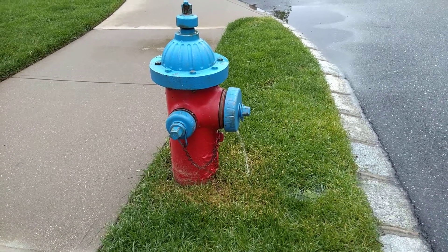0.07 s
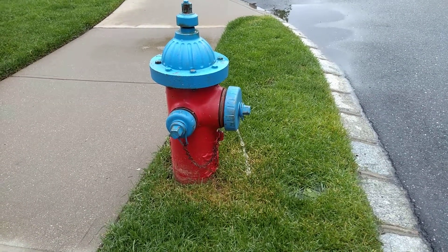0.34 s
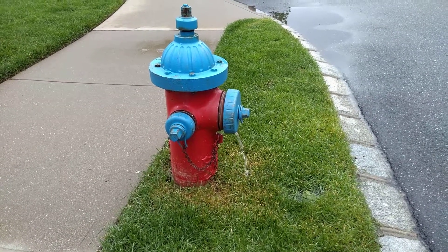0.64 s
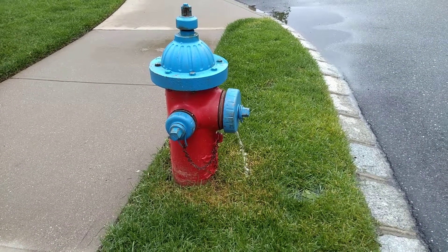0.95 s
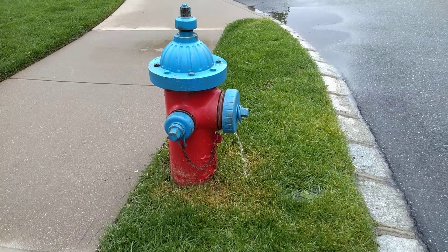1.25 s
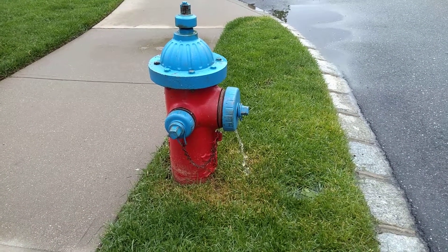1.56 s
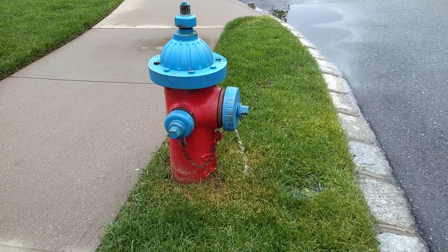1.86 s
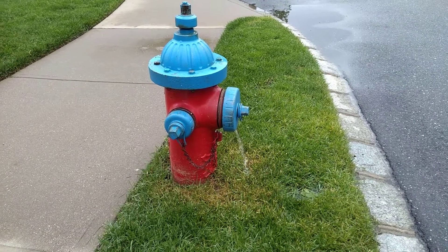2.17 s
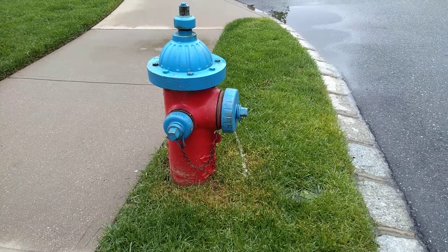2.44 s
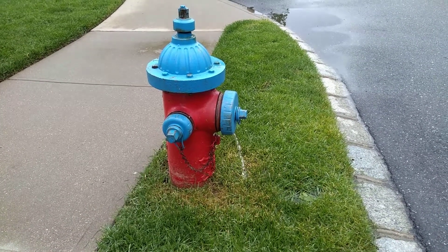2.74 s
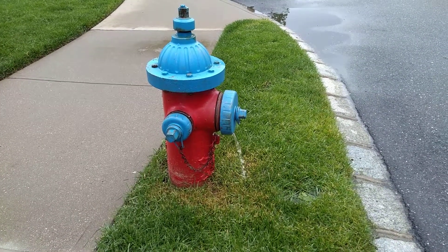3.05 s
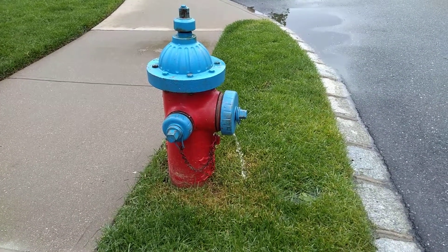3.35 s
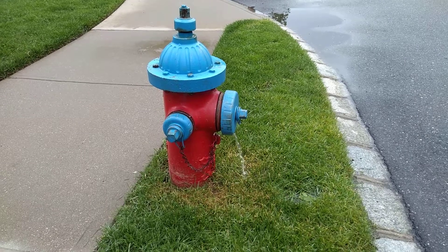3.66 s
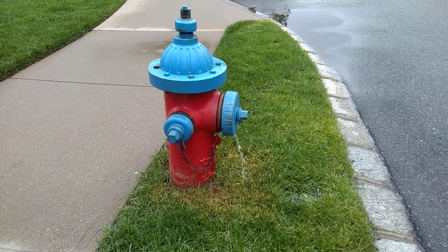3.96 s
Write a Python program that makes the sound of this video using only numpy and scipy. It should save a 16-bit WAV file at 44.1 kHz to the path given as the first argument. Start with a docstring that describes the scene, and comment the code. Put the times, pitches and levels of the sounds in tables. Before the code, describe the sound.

Water leaking from a hydrant splatters onto soaked grass, with faint traffic behind.

```python
"""A thin stream leaks from a hydrant, breaks into drops and patters on wet grass about two metres away.
Each drop slaps the soaked turf, ticks off the blades and throws a fizz of spray, with tiny bubbles
ringing in it. A few plop into the puddle, and fine droplets sizzle in between.
Distant traffic lays a rumbling bed behind. Two spaced microphone ports give the stereo image."""
import sys
import numpy as np
from scipy.fft import rfft, irfft, next_fast_len
from scipy.io import wavfile
from scipy.ndimage import uniform_filter1d, map_coordinates

SR = 44100
rng = np.random.default_rng(int(sys.argv[2]) if len(sys.argv) > 2 else 0)


def store_wav(level_fs):
    """Save 16-bit WAV to argv[1]."""
    pcm = np.round(np.clip(np.atleast_2d(level_fs), -1, 1) * 32767)
    wavfile.write(sys.argv[1], SR, pcm.T.astype(np.int16))


N = 176400

# Traffic fader moves, before the trims (time [s], rumble [dB], engine drone [dB], road roar [dB])
TRAFFIC_FADERS = [(0.05, -48, -42, -39.5), (0.46, -49.5, -45.5, -37.5), (0.56, -49.5, -45.5, -39.5),
                  (1.18, -46.5, -46, -41), (2.95, -52, -43, -40.5), (3.53, -44.5, -45.5, -41),
                  (3.92, -47.5, -41, -43)]
# EQ curves of the four traffic layers (frequency [Hz], level [dB])
RUMBLE_EQ = [(20, -19), (29, -33), (42, -9), (55, -8), (72, 3), (100, -4.5), (130, -23), (250, -55)]
DRONE_EQ = [(70, -28), (112, -4), (134, 1), (152, -5), (185, -7), (230, -20), (400, -45)]
ROAR_EQ = [(130, -18.5), (200, -2), (265, -1), (310, -6), (400, -20.5), (700, -60), (2000, -81)]
TYRES_EQ = [(100, -8.5), (350, 3.5), (430, -1.5), (510, 3), (680, -3.5), (860, 0.5), (1150, -3.5),
            (1500, -2), (1850, -4), (2200, -9.5), (3000, -17.5), (6000, -31), (14000, -49)]
# Stereo image of the traffic (frequency [Hz], left-right correlation [clipped to -1..1])
TRAFFIC_CORRELATION = [(30, -0.86), (65, 0.11), (95, 0.68), (140, 0.5), (260, 0.47), (380, 0.33),
                       (600, 0.5), (1000, 0.99), (1300, 0.32), (1600, 0.061), (2150, -1.134), (3000, 1),
                       (4300, -0.96), (5500, -0.17), (8000, -0.7)]

# Heavy drop cues, before the trims (time [s], slap [dB], tick [dB], fizz [dB], decay before clipping [s])
HEAVY_DROPS = [(0.0367, -43, -43, -46.5, 0.0012), (0.047, -48, -37.5, -43, 0.0032),
               (0.0869, -34, -41, -43.5, 0.002), (0.2203, -46, -42, -40.5, 0.0017),
               (0.2457, -54, -48, -42, 0.0016), (0.2787, -59, -50, -40.5, 0.0013),
               (0.3415, -45.0, -45.0, -43, 0.0028), (0.421, -42, -43, -40, 0.0019),
               (0.4314, -42, -45, -44, 0.0035), (0.5265, -40, -48, -42.5, 0.0034),
               (0.6357, -41, -45.5, -43, 0.0013), (0.643, -40.5, -41.5, -45.5, 0.0023),
               (0.7055, -40.5, -59, -41.5, 0.0008), (0.8838, -43.5, -57.5, -45, 0.00063),
               (0.9133, -42, -44, -40, 0.0028), (0.9551, -38.0, -39, -36, 0.0032),
               (1.0936, -38, -53.0, -46.5, 0.0007), (1.1518, -45, -46.0, -41.5, 0.0021),
               (1.1863, -40.0, -48, -43.5, 0.0026), (1.221, -35, -41, -45, 0.0016),
               (1.2634, -34.5, -53, -46, 0.00082), (1.2828, -38, -40.5, -47.0, 0.00045),
               (1.3775, -45, -35.5, -39, 0.0043), (1.4418, -44, -47, -49, 0.0013),
               (1.4664, -40.5, -60.5, -61, 0.00071), (1.5185, -38, -48.0, -44, 0.0011),
               (1.6011, -40.5, -38.5, -43.5, 0.0009), (1.6347, -38.5, -51, -44.5, 0.0022),
               (1.729, -40, -44, -39.5, 0.0039), (1.7554, -35.5, -63, -54.5, 0.002),
               (1.7765, -49.0, -61, -41.0, 0.00072), (1.818, -41, -55.5, -47, 0.00031),
               (1.8251, -37.5, -50.5, -44, 0.0011), (1.8716, -41.0, -42, -46, 0.0017),
               (1.8993, -46, -41.5, -45.5, 0.0018), (1.975, -45.0, -39, -54, 0.0012),
               (1.9992, -43, -43, -57, 0.001), (2.0077, -47, -42, -48, 0.0014),
               (2.0206, -39, -42, -47.5, 0.0011), (2.044, -38.5, -50, -45, 0.0019),
               (2.0939, -57, -64, -41, 0.00066), (2.134, -39.5, -60, -40.0, 0.0063),
               (2.185, -38, -44, -48, 0.00068), (2.2253, -61, -38, -50, 0.0012),
               (2.3118, -46, -44, -41, 0.005), (2.3526, -34.5, -48, -46, 0.0038),
               (2.3705, -63.0, -61, -43.0, 0.00067), (2.3904, -47, -56, -45.0, 0.00086),
               (2.4192, -50, -55, -41, 0.0012), (2.4271, -42, -44, -51, 0.0014),
               (2.4812, -42.0, -44.5, -43, 0.0016), (2.5292, -46, -43, -44.5, 0.0024),
               (2.587, -47, -56, -44, 0.0012), (2.6111, -45.5, -38, -52, 0.00062),
               (2.7483, -43.5, -47, -47.0, 0.00072), (2.782, -42, -49.5, -44, 0.0027),
               (2.8011, -45, -37.5, -44, 0.0022), (2.812, -42, -44, -43.0, 0.0038),
               (2.893, -36.5, -48, -51, 0.0011), (2.9363, -39.0, -45, -47, 0.001),
               (3.025, -46, -39, -34.0, 0.00028), (3.033, -43, -46, -41, 0.0017),
               (3.099, -38.5, -43, -38.5, 0.0009), (3.1478, -47, -61, -48, 0.001),
               (3.1641, -49, -55.0, -43.0, 0.001), (3.2264, -34.5, -46.0, -40, 0.00099),
               (3.3241, -47, -51, -43.5, 0.0027), (3.362, -60, -58, -40, 0.003),
               (3.3894, -39, -43, -42.5, 0.0017), (3.411, -39.5, -48, -41, 0.0027),
               (3.4502, -44, -45, -43, 0.0027), (3.542, -43.5, -40, -39.5, 0.00097),
               (3.5668, -54, -40, -43, 0.0009), (3.5841, -44.5, -32.5, -39, 0.0007),
               (3.6283, -41, -49, -43.5, 0.0014), (3.69, -39, -50, -49, 0.0027),
               (3.7375, -28, -29.5, -48, 0.00049), (3.7648, -39.0, -56, -60, 0.001),
               (3.8513, -44, -41, -40.5, 0.0018), (3.914, -44, -41.5, -41.5, 0.0021),
               (3.9574, -49.5, -38, -44, 0.0019), (3.9767, -38.5, -60.5, -46, 0.0009)]
# Puddle cues, before the trim (time [s], level [dB], starting pitch [Hz])
PUDDLE_PLOPS = [(1.048, -30.5, 920), (1.095, -36, 1000), (1.601, -36, 1070), (2.266, -32.5, 1020),
                (2.481, -30.5, 1270)]
# EQ curves of turf slap, blade tick, spray fizz and droplet sizzle (frequency [Hz], level [dB])
SLAP_EQ = [(400, -18), (1000, -9), (2100, -5), (2800, 5), (3600, 4.5), (4200, 3), (5500, -16), (9000, -30)]
TICK_EQ = [(800, -3), (3800, -4.5), (5100, 4.5), (5800, 8.5), (7000, -7.5), (8600, -14), (14000, -22)]
FIZZ_EQ = [(1500, -31), (5000, -18), (7000, 2), (8600, 3.5), (9800, 0), (11000, 2.5), (12500, -3.5),
           (14400, -11)]
SIZZLE_EQ = [(1500, 9), (3200, 15.5), (4500, 7), (11000, -9), (14400, -16)]
# Stereo width of the spray (frequency [Hz], amplitude share unique to each port [0..1])
SPRAY_WIDTH = [(3000, 0.12), (5500, 0.33), (6500, 0.88)]

# Late arrival of the water at the left port (frequency [Hz], phase lag [rad])
LEFT_PORT_LAG = [(1200, 0.5), (1700, 2.5), (2300, 3.5), (2650, 6.5), (3600, 6.5), (4250, 10.5), (5000, 13),
                 (7400, 13.5), (10300, 23), (12000, 26.3)]
# Notches from the microphone's hollows (centre [Hz], width [Hz], gain [dB])
PORT_NOTCHES = [(2350, 470, -8), (4504, 390, -15), (7080, 330, -3.5)]
# Imbalance of the ports (frequency [Hz], left minus right [dB])
PORT_BALANCE = [(60, -1), (170, 3.5), (280, -4.5), (390, -0.5), (520, -4), (700, 2.5), (1100, -0.5),
                (1500, 3), (2200, 0.5), (5500, 0), (9500, 0.5), (14000, 0.5)]

# Bubble voices (pitch [Hz], pitch spread [natural log], attack [s], decay [s], gain [dB])
TURF_BUBBLE = (3147, .11, .0004, .0015, 18)
FOAM_BUBBLE = (9300, .285, .00048, .00024, 10.5)

RUMBLE_TRIM_DB, DRONE_TRIM_DB, ROAR_TRIM_DB, TYRES_DB = 4, 3, .84, -43.5
SPRAY_TRIM_DB, PLOP_TRIM_DB, HEAVY_TRIM_DB = 19, 1, .5
GRIT_DB, HALO_DB, HALO_LEAD_S, HALO_TAIL_S = 3.5, -22, .003, .006
DROPLETS_PER_S, DROPLET_DB, DROPLET_SPREAD_DB = 400, -64, 6.5
PATTER_PER_S, SIZE_SPREAD_DB, COLOUR_SPREAD_DB = 125, 2.5, 4.5
PATTER_SLAP_DB, PATTER_TICK_DB, PATTER_FIZZ_DB = -49.5, -53.5, -51.5
LULL_DB, LULL_S = 8, .009
SPUTTER_DB, SPUTTER_PER_S = 3, 30
HIGH_CUT_HZ = 14550


def amp(db):
    return 10 ** (np.asarray(db) / 20)


def unit_rms(x):
    return x / np.sqrt(np.mean(x ** 2) + 1e-20)


def curve(points, hz):
    """Read (frequency [Hz], value) breakpoints on a log frequency axis."""
    knots_hz, values = np.transpose(points)
    return np.interp(np.log(hz + 1), np.log(knots_hz + 1), values)


def filtered(x, response):
    """Shape x with a complex frequency response."""
    size = next_fast_len(N + SR // 2)
    return irfft(rfft(x, size) * response(np.fft.rfftfreq(size, 1 / SR)), size)[..., :N]


def wobble(knots_per_s):
    """A smooth random modulator."""
    knots = rng.standard_normal(int(N * knots_per_s / SR) + 4)
    return map_coordinates(knots, [np.arange(N) * knots_per_s / SR])


def burst(t, attack_s, decay_s):
    """An envelope with a soft attack and an exponential tail."""
    return (1 - np.exp(-(t / attack_s) ** 2)) ** 2 * np.exp(-t / decay_s)


def place_grains(times, level_db, grains):
    """Bring each grain to unit energy, set its level and lay it on the timeline."""
    at = np.abs(np.round(times * SR)).astype(int)[:, None] + np.arange(grains.shape[1])
    gain = amp(level_db) / np.linalg.norm(grains, axis=1)
    return np.bincount(at.ravel(), (grains * gain[:, None]).ravel(), N)[:N]


def noise_bed(eq):
    """Coloured noise at unit RMS with the stereo image of the traffic."""
    def mid_side_eq(hz):
        angle = np.arccos(np.clip(curve(TRAFFIC_CORRELATION, hz), -1, 1)) / 2
        return amp(curve(eq, hz)) * [np.cos(angle), np.sin(angle)]

    mid, side = filtered(rng.standard_normal((2, N)), mid_side_eq)
    return unit_rms(np.array([mid + side, mid - side]))


def traffic():
    """Far engines rumble and drone, the road roars and tyres rush, all drifting slowly."""
    t = np.arange(N) / SR
    times, *faders = np.transpose(TRAFFIC_FADERS)
    layers = zip(faders, (RUMBLE_TRIM_DB, DRONE_TRIM_DB, ROAR_TRIM_DB), (RUMBLE_EQ, DRONE_EQ, ROAR_EQ))
    low_end = sum(amp(np.interp(t, times, db) + trim) * noise_bed(eq) for db, trim, eq in layers)
    tyres = amp(TYRES_DB + 1.3 * wobble(knots_per_s=2.81)) * noise_bed(TYRES_EQ)
    return low_end + tyres


def spray(times, level_db, eq, decay_s):
    """Gritty bursts of splashing water; their treble scatters differently to the two ports."""
    t = (np.arange(1024) - 256) / SR  # pre-roll lets the splash swell ahead of the hit
    decay_s = np.clip(np.reshape(decay_s, (-1, 1)), .0002, .005)
    attack_s = .5 * decay_s
    hit = burst(np.maximum(t, 0), attack_s, decay_s)
    halo = np.exp(np.minimum((t - attack_s) / HALO_LEAD_S, (attack_s - t) / HALO_TAIL_S))
    envelope = hit / hit.max(axis=1, keepdims=True) + amp(HALO_DB) * halo
    noise = rng.standard_normal((len(times), 4, len(t))).swapaxes(0, 1)
    grit = amp(GRIT_DB * unit_rms(uniform_filter1d(noise[0], size=24, axis=1)))
    hz = np.fft.rfftfreq(len(t), 1 / SR)
    common, *ports = rfft(noise[1:] * grit * envelope) * amp(curve(eq, hz))
    width = np.clip(curve(SPRAY_WIDTH, hz), 0, 1)
    channels = [irfft(common * np.sqrt(1 - width ** 2) + own * width) for own in ports]
    return np.array([place_grains(times + t[0], level_db + SPRAY_TRIM_DB, grains) for grains in channels])


def lull_db(times):
    """Small drops duck by this much while a heavy one gathers."""
    until_heavy_s = np.array(HEAVY_DROPS)[:, 0] - times[:, None]
    off_centre_s = np.abs(until_heavy_s - LULL_S / 2).min(axis=1)
    return LULL_DB * np.exp(-(off_centre_s / LULL_S) ** 2)


def droplets():
    """Fine droplets sizzle on the blades between the drops."""
    count = int(DROPLETS_PER_S * N / SR)
    times = rng.uniform(0, N / SR, count)
    level_db = DROPLET_DB + DROPLET_SPREAD_DB * rng.standard_normal(count) - lull_db(times)
    return spray(times, level_db, SIZZLE_EQ, decay_s=.0005)


def plops():
    """Larger bubbles in the puddle ring low, bending up in pitch."""
    track = np.zeros(N + SR)
    t = np.arange(SR // 25) / SR
    envelope = burst(t, attack_s=.00054, decay_s=.0035)
    for start_s, db, hz in PUDDLE_PLOPS:
        chirp = np.sin(2 * np.pi * hz * t * (1 + 6 * t))
        track[round(start_s * SR):][:len(t)] += amp(db + PLOP_TRIM_DB) * envelope * chirp
    return track[:N]


def bubbles(times, level_db, voice):
    """Tiny trapped bubbles ring for a few cycles, each at its own pitch."""
    hz, spread, attack_s, decay_s, gain_db = voice
    t = np.arange(SR // 80) / SR
    detune, phase = rng.standard_normal((len(times), 2)).T[:, :, None]
    rings = np.sin(2 * np.pi * (hz * np.exp(spread * detune) * t + phase))
    return place_grains(times, level_db + gain_db, rings * burst(t, attack_s, decay_s))


def drops(times, slap_db, tick_db, fizz_db, decay_s):
    """A drop layers a turf slap and its bubble, a tick on the blades, and fizz with a foam bubble."""
    layers = (slap_db, SLAP_EQ), (tick_db, TICK_EQ), (fizz_db, FIZZ_EQ)
    rings = bubbles(times, slap_db, TURF_BUBBLE) + bubbles(times, fizz_db, FOAM_BUBBLE)
    return rings + sum(spray(times, db, eq, decay_s) for db, eq in layers)


def patter():
    """Ordinary drops land softly in a loose rhythm, each with its own size and colour."""
    count = int(PATTER_PER_S * N / SR)
    jitter, size, *colour = rng.standard_normal((count, 5)).T
    times = (np.arange(count) + jitter) / PATTER_PER_S
    size_db = SIZE_SPREAD_DB * np.minimum(size, 1)
    slap, tick, fizz = size_db + COLOUR_SPREAD_DB * np.minimum(colour, 1) - lull_db(times)
    return drops(times, PATTER_SLAP_DB + slap, PATTER_TICK_DB + tick, PATTER_FIZZ_DB + fizz, decay_s=.0033)


def heavy_drops():
    """The stream's heavy drops hit up front: short ones snap, longer ones splat."""
    return amp(HEAVY_TRIM_DB) * drops(*np.transpose(HEAVY_DROPS))


def scene():
    """Water over the traffic bed, reaching the left port slightly late."""
    def port_lag(hz):
        return np.exp(np.array([[-.5j], [.5j]]) * curve(LEFT_PORT_LAG, hz))

    street = traffic()
    sputter = amp(SPUTTER_DB * np.minimum(wobble(SPUTTER_PER_S), 1))  # small drops come in spurts
    water = heavy_drops() + plops() + sputter * (patter() + droplets())
    return street + filtered(water, port_lag)


def record(dry):
    """The microphone's hollows notch the mix, its unequal ports skew it and a steep high cut tops it."""
    def port_eq(hz):
        notches_db = sum(db * np.exp(-((hz - centre) / width) ** 2) for centre, width, db in PORT_NOTCHES)
        balance_db = curve(PORT_BALANCE, hz) * np.array([[.5], [-.5]])
        return amp(notches_db + balance_db)

    coloured = filtered(dry, port_eq)
    return filtered(coloured, lambda hz: 1 / np.sqrt(1 + (hz / HIGH_CUT_HZ) ** 120))


dry = scene()
out = record(dry)
store_wav(out)
```